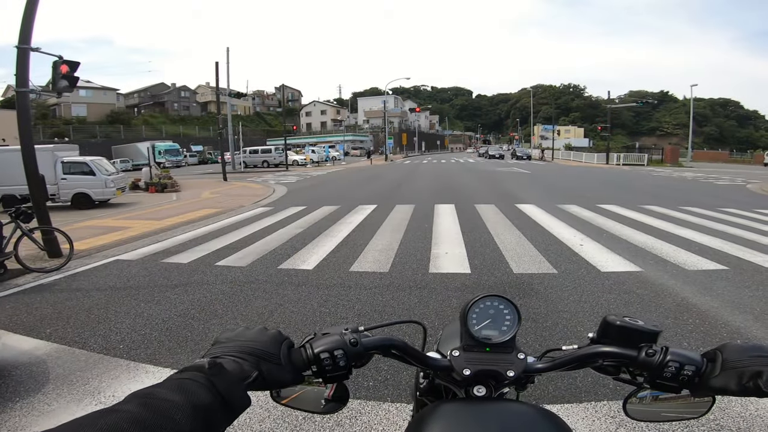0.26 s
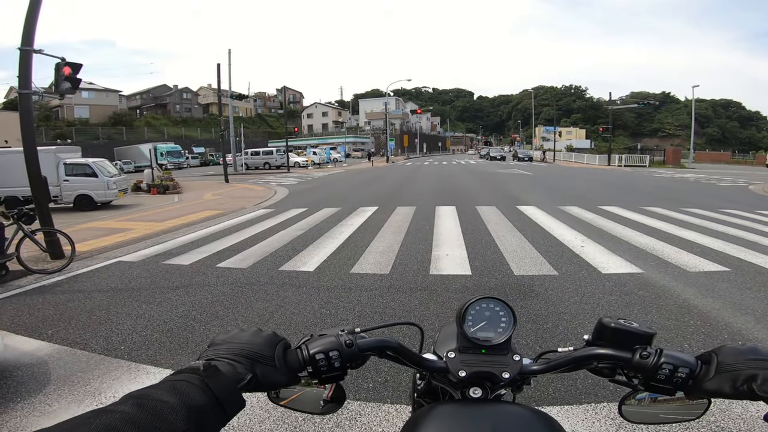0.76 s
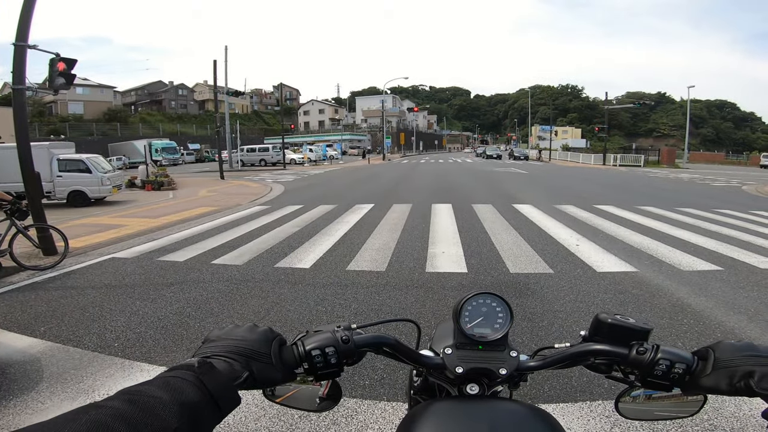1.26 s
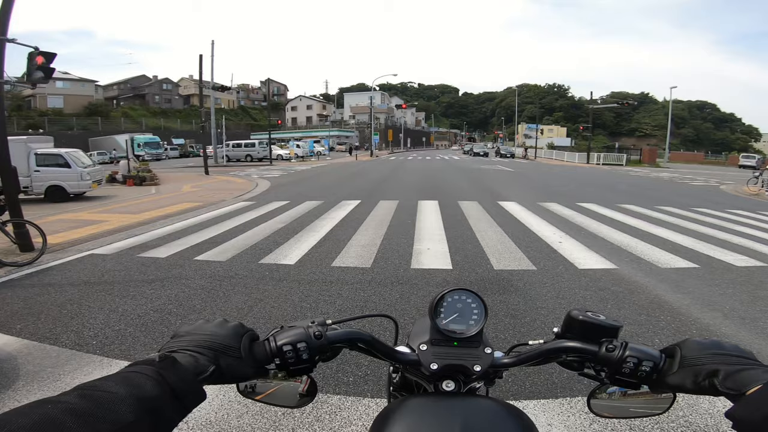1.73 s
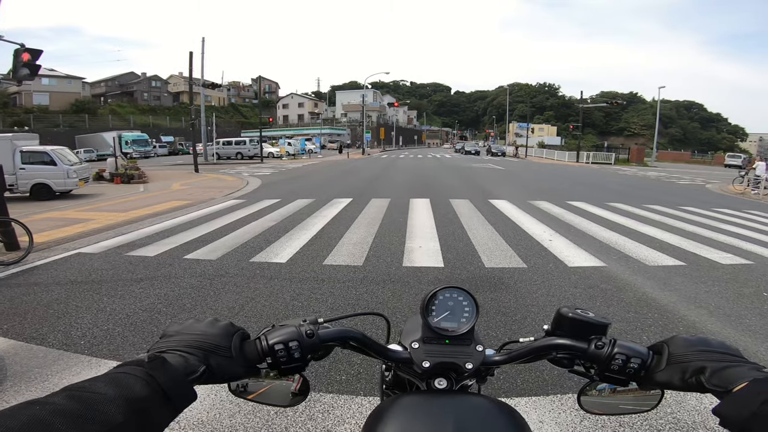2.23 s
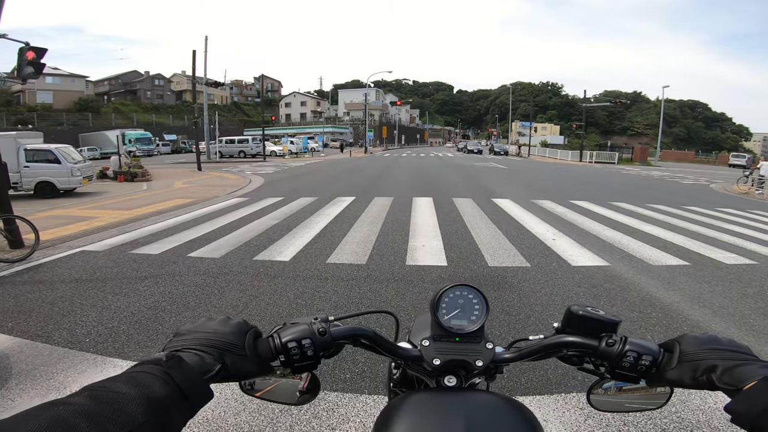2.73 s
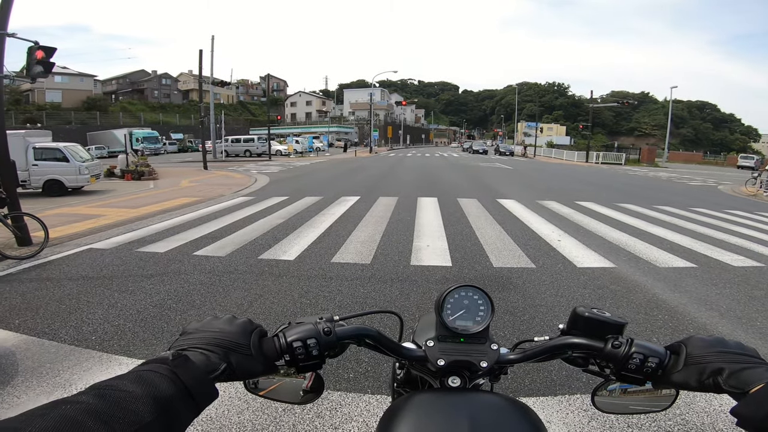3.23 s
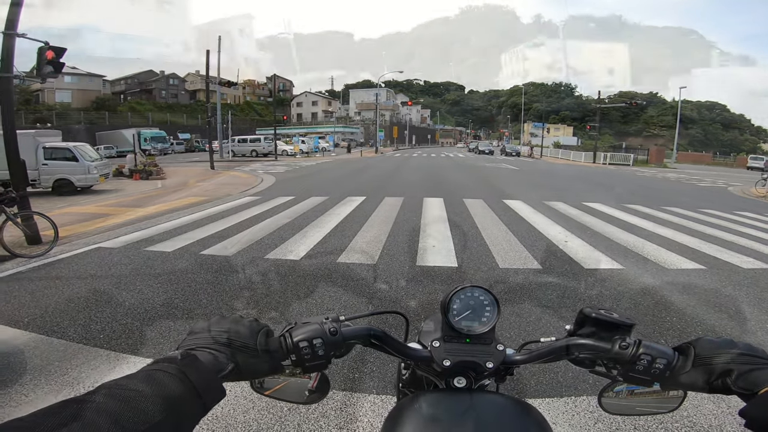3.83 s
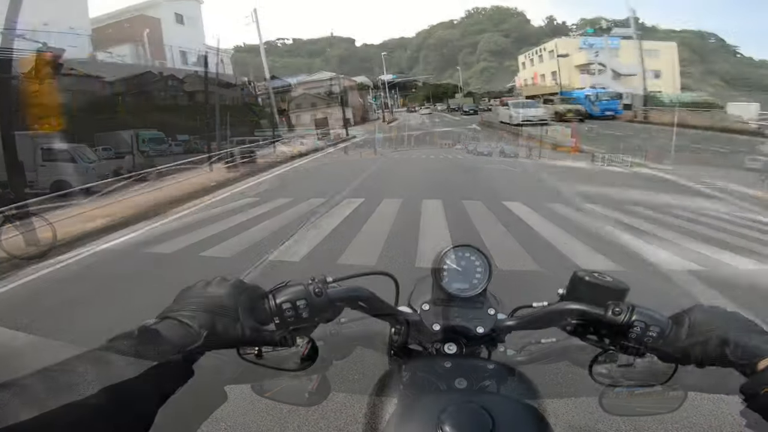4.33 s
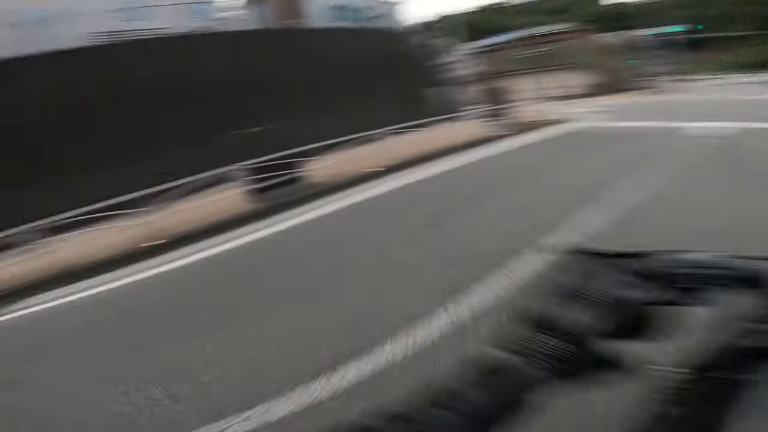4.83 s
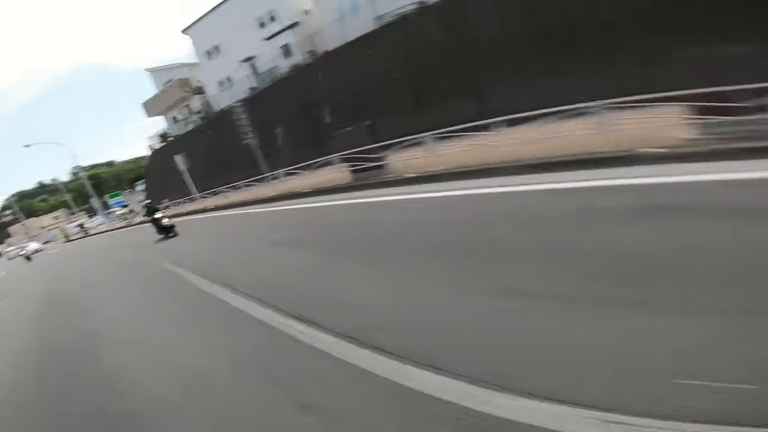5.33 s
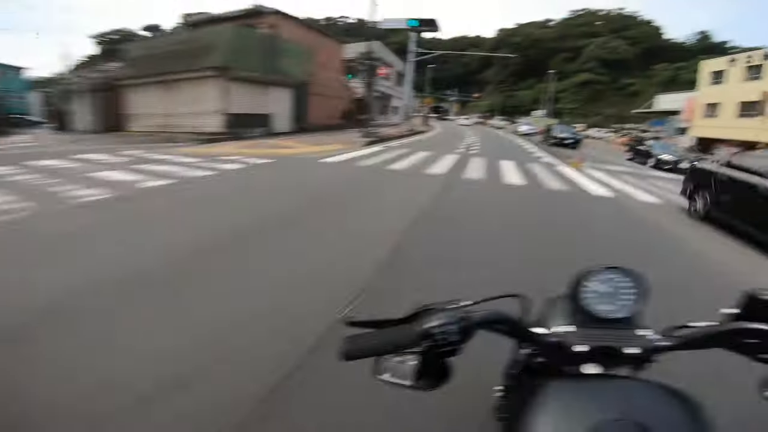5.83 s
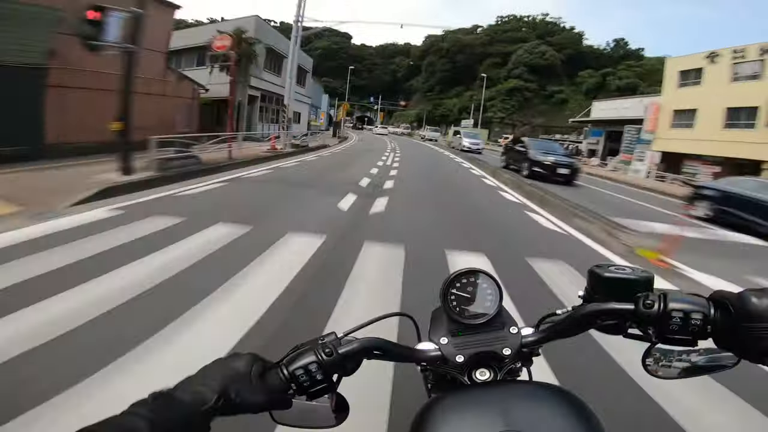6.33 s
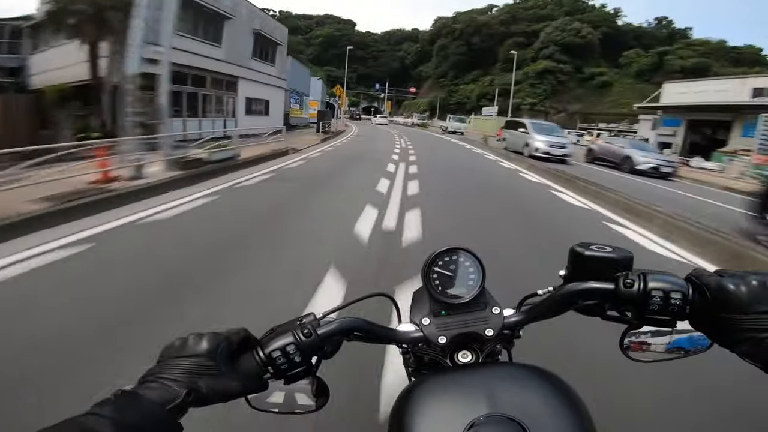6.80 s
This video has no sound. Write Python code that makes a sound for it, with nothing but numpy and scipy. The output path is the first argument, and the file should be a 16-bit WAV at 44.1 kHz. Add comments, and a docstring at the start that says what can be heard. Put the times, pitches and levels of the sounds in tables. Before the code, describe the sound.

From the start, a V-twin motorcycle idles close by, heard from the saddle. It chugs in a low, limping rhythm, with occasional weak beats, sharp exhaust puffs and a light metallic valve rattle. The bass sits near the centre and the crackle to the right. Between about 3.7 and 4.5 seconds the idle cross-fades into the faster, steadier beat of the bike on the move, and a wide road roar comes up. From 4.3 to 4.8 seconds the throttle shuts and the exhaust softens while low gusts of wind buffet the microphone. At about 4.8 seconds the engine comes back louder and raspier. Several short whooshes pass between 4.8 and 5.8 seconds, alongside a thin, steady whine. From 6 seconds the road noise recedes and the revs climb gently, the exhaust crackling harder until the end at about 7 seconds.

```python
"""A lumpy V-twin idle, heard from the saddle; around 4 s it cross-fades into riding along a street.
Each firing rings its pipe, whose pitch climbs late in the stroke as the piston shrinks the cylinder
behind the open exhaust valve. Gas cracks out of the pipes on the right, each blow-down strikes the
metal, and the valve gear rattles. Road roar, wind, whooshes and a thin whine join on the move."""
import sys
import numpy as np
from scipy import signal
from scipy.fft import rfft, irfft
from scipy.io import wavfile
from scipy.ndimage import uniform_filter1d

SR = 44100
rng = np.random.default_rng(int(sys.argv[2]) if len(sys.argv) > 2 else 0)


def unload_audio(sound):
    """Save the sound as a 16-bit wav file, at the path given as the first command line argument."""
    columns = np.transpose(np.atleast_2d(sound))
    # keep every value between -1 and 1, then stretch to whole-number steps
    steps = np.round(np.clip(columns, -1, 1) * 32767)
    wavfile.write(sys.argv[1], SR, steps.astype(np.int16))


N = 311326
T, HZ = np.arange(N) / SR, np.arange(1, N // 2 + 2) * SR / N

# Stereo image, left ear against right
EAR_BALANCE = [(60, -1), (110, -1.0), (200, -1), (380, -1), (700, -9.5), (1290, -9.5), (2380, -9),
               (4400, -6.5), (8120, -10), (15000, -4)]  # f/Hz, left minus right/dB
EAR_LEAD = [(0, 0), (430, 0.44), (780, -2), (1550, -2.5), (2410, -5.5), (2760, -4.5), (3880, -4.5),
            (4310, -5), (5080, -8), (7750, -9), (9300, -15), (11600, -8.5), (14200, -6), (15200, -12.5)]  # f/Hz, left lead/rad
EAR_LIKENESS = [(60, 1), (300, .9), (650, .65), (1500, .62), (4000, .55), (9000, .4)]  # f/Hz, likeness/0-1
# Noise colours: f/Hz, relative level/dB
WIND_COLOUR = [(15, -21), (45, -6.5), (120, -11.5), (250, -16.5), (500, -33.5), (1500, -56), (8000, -100)]
ROAD_COLOUR = [(100, -12), (250, -1.5), (500, -9.5), (900, -15.5), (1400, -17), (2500, -27), (5000, -38),
               (10000, -46), (15500, -105.5)]
WHOOSH_COLOUR = [(250, -8.5), (500, -10), (1000, -12.5), (2000, -20), (3500, -36), (8000, -50),
                 (15500, -87)]
RATTLE_COLOUR = [(210, -14), (350, -2), (367, -5), (417, -1), (619, -12.5), (920, -11), (1060, -14.5),
                 (1730, -9), (2200, -16.5), (2620, -15.5), (3950, -26.5), (8730, -33), (13800, -59),
                 (15400, -72)]
IDLE_CRACK_COLOUR = [(300, -18), (800, 3), (1300, -5), (1750, 2), (2150, -4.5), (2650, -4), (3600, -10),
                     (5000, -16.5), (7800, -19.5), (10000, -23), (12000, -34), (15500, -43)]
HOT_CRACK_COLOUR = [(300, -21), (800, 5.5), (1300, -3), (2000, 2), (2650, -2), (3600, -7.5), (5000, -12.5),
                    (7800, -14.5), (10000, -21), (12000, -29), (15500, -38)]
# Faders for the wind between gusts, the road and the whole idle: t/s, level/dB
BREEZE_FADER = [(3.7, -65), (4.2, -54), (5.0, -26), (7.06, -33)]
ROAD_FADER = [(3.7, -86), (3.9, -58), (4.33, -25), (4.75, -22.5), (5.0, -26.5), (5.85, -28), (6.1, -29.5),
              (7.06, -47)]
IDLE_FADER = [(0, -12), (3.7, -12), (4.0, -17.5), (4.3, -22.5), (4.55, -15.5)]
# Riding faders, throttle shut from 4.3 to 4.8 s: t/s, pipe level/dB, crack level/dB
RIDE_FADERS = [(3.7, -42, -40), (3.9, -25.5, -31), (4.1, -17, -28), (4.29, -16.5, -25), (4.33, -22.5, -42),
               (4.62, -16.5, -47), (4.75, -13, -60), (4.85, -11.5, -26.5), (5.2, -13, -31), (5.6, -13, -26),
               (6.1, -13, -21), (7.06, -10.5, -17.5)]
# Swells of air: t/s, length/s, level/dB
GUST_SWELLS = [(4.25, .12, -25), (4.38, .1, -20), (4.6, .2, -22), (4.85, .08, -24), (5.32, .08, -27),
               (5.46, .1, -24), (6.75, .15, -36)]
WHOOSH_SWELLS = [(4.864, 0.06, -25), (5.015, 0.16, -20.5), (5.63, 0.16, -24.5), (5.718, 0.15, -25)]
# Path of the whine: t/s, f/Hz, level/dB
WHINE_PATH = [(4.6, 352.5, -65), (4.8, 349, -27), (5.0, 344.6, -27.5), (5.5, 349.7, -26.5),
              (5.75, 349, -34), (5.95, 351, -56)]
# Modes of heads and pipes: f/Hz, idle level/dB, riding level/dB, t60/s
METAL_MODES = [(415, -24, -27, .05), (1780, -32, -28, .035), (2450, -22, -21, .042), (2750, -20, -20, .045),
               (3300, -28, -20, .04), (3950, -28, -21, .04), (4700, -36, -28, .035)]
# A pipe through its exhaust stroke; past 1 the valve has shut:
# share of valve-open time, pitch f/Hz, level/dB, overtone f/Hz, level/dB
FRONT_IDLE_STROKE = [(0, 90, -9, 284, -11), (.2, 94.8, 2, 227, -13), (.42, 73.8, -3, 213.7, -19),
                     (.65, 82.5, 4, 251.4, -21), (.85, 114, -1.5, 302, -21), (.96, 179, -2.5, 303, -10),
                     (1.05, 135, -19, 306.2, -11)]
REAR_IDLE_STROKE = [(0, 84.3, -16.5, 256, -38.5), (0.151, 98.8, 2.5, 247.5, -11.5), (.4, 91, 3, 240, -55),
                    (.7, 117.7, 2, 274, -33), (.95, 156, 3, 341, -67.5), (1.05, 116.8, -4, 311, -25.5)]
FRONT_RIDE_STROKE = [(0, 71.3, -12, 300, -21), (.2, 134, 8, 249.3, -9.5), (.36, 102, 5.5, 241.5, -5),
                     (.58, 62, 1.5, 244, -11.5), (.82, 102, -2, 265, -16.5), (.97, 197, 4.5, 301, -37.5),
                     (1.05, 131, -16.5, 310.6, -12)]
REAR_RIDE_STROKE = [(0, 92.7, -11, 270, -21.5), (.2, 121.7, 8, 278.7, -25), (.45, 103.2, 5.5, 288, -9.5),
                    (.72, 111, 0.5, 282.5, -16.5), (0.922, 188, 2, 310, -27.5),
                    (1.052, 125, -19, 297.2, -14)]
# Upper pipe voices: t/s, bark f/Hz, bark level/dB, third partial against overtone/dB, metal level/dB
IDLE_VOICING = [(0, 890, -20, -32.5, -3.5), (4.5, 790, -31, -19, -3)]
RIDE_VOICING = [(3.701, 1050, -15, -15, -1), (4.3, 1030, -9, -9.5, -2.5), (4.4, 900, -28, -29, -14),
                (4.8, 976, -41, -12, -10), (5.0, 1112, 0.5, -2.5, -2), (5.7, 1090, -1, -22, -2),
                (5.9, 1010, -9.5, -6, 6), (6.3, 880, -6.5, -0.5, -3), (7.06, 830, -5, -8, -2.5)]
# Engine speed: t/s, speed/rpm
IDLE_REVS = [(-.02, 942.3), (.15, 890.7), (.35, 941.9), (.9, 968.2), (1.3, 948.1), (2.1, 890.3),
             (2.6, 911.9), (3.0, 868.6), (3.6, 924), (3.8, 899), (4.5, 916)]
RIDE_REVS = [(3.7, 1648.3), (4.3, 1644.4), (4.7, 1594.4), (4.85, 1654.8), (5.05, 1599.3), (5.5, 1626.6),
             (6.0, 1658.5), (6.5, 1766.1), (7.2, 1851.5)]
# Odd rear firings at idle, most of them weak: t/s, charge/dB, crack level/dB
REAR_STUMBLES = [(.12, -3, -25), (.38, -6, -22), (.63, -3.5, -22), (.88, -8.5, -14), (1.26, -4, -25),
                 (1.51, -8.5, -25), (1.9, 1.5, -10), (2.17, 0.5, -2.5), (2.7, 1.5, -8), (2.84, 0.5, -1.5),
                 (3.64, -6, -26), (4.04, -12.5, 7), (4.17, -24, -13), (4.3, -6, 5), (4.44, -16, -7)]

OPEN_SHARE, REAR_LAG, VALVE_SEATS = .37, .423, .73  # shares of a cycle
PITCH_T60_S, OVERTONE_T60_S = .31, .28  # pipe decay with the valve shut
GUST_DB, FLICKER_DB, CRACK_SCATTER_DB = 2.4, 1.5, 1.1  # random level swings
HOT_FROM_DB, HOT_SPAN_DB = -36.5, 14.5  # the crack takes on the hot colour as it grows louder


def undb(db):
    """Gain of a level in dB."""
    return 10 ** (np.asarray(db) / 20)


def curves(table):
    """Each column of a timed table, sample by sample."""
    s, *columns = np.transpose(table)
    return [np.interp(T, s, c) for c in columns]


def over_hz(table):
    """A table of f/Hz, value spread over the spectrum."""
    f, v = np.transpose(table)
    return np.interp(np.log(HZ), np.log(np.maximum(f, 1)), v)


def walk(rate):
    """Smooth random wobble, rate steps a second; spread near 1."""
    k = int(SR / rate)
    steps = np.repeat(rng.standard_normal(N // k + 1), k)
    return 1.33 * uniform_filter1d(uniform_filter1d(steps, k), k)[:N]


def swells(events, t):
    """Bell-shaped swells from rows of t/s, length/s, height."""
    return sum(height * np.exp(-((t - at) / length) ** 2 * 4) for at, length, height in events)


def add(out, s, grain):
    """Mix a grain in at time s."""
    i = int(round(s * SR))
    part = grain[max(-i, 0):max(N - i, 0)]
    out[max(i, 0):max(i, 0) + len(part)] += part


def ring(t, hz, db, t60):
    """A struck mode dying away."""
    return undb(db - 60 * t / t60) * np.sin(2 * np.pi * hz * t)


def ears():
    """Phase lead, likeness and balance of the left ear against the right."""
    lead = np.exp(1j * np.interp(HZ, *np.transpose(EAR_LEAD)))
    return lead, np.clip(over_hz(EAR_LIKENESS), 0, 1), over_hz(EAR_BALANCE)


def at_ears(tone):
    """Place a tone: bass near the centre, treble to the right."""
    lead, _, pan_db = ears()
    return irfft([rfft(tone) * lead * undb(pan_db / 2), rfft(tone) * undb(-pan_db / 2)], N)


def noise(spectrum, envelope, like, pan_db):
    """Stereo noise, shaped then coloured; like is the channels' likeness, with its phase."""
    colour = undb(over_hz(spectrum))
    colour /= np.sqrt(np.mean(colour ** 2))
    right, other = rfft(rng.standard_normal((2, N)) * envelope) * colour
    left = like * right + np.sqrt(np.clip(1 - np.abs(like) ** 2, 0, 1)) * other
    return irfft([left * undb(pan_db / 2), right * undb(-pan_db / 2)], N)


def bike_noise(spectrum, envelope):
    """Noise placed to the right, with the pipes."""
    lead, like, pan_db = ears()
    return noise(spectrum, envelope, lead * like, pan_db)


def road_roar():
    """A wide, wavering bed of road noise."""
    lead, like, pan_db = ears()
    level = undb(curves(ROAD_FADER)[0] + 1.5 * walk(11))
    return noise(ROAD_COLOUR, level, .25 * lead * like, .33 * pan_db)


def wind():
    """Low buffeting at the ears: a breeze with gusts on top."""
    gusts = swells([(at, length, undb(db)) for at, length, db in GUST_SWELLS], T)
    blowing = undb(curves(BREEZE_FADER)[0]) + gusts
    return noise(WIND_COLOUR, blowing * undb(GUST_DB * walk(25)), like=.41, pan_db=2.1)


def whooshes():
    """Short swells of noise, largely out of phase between the ears."""
    level = swells([(at, length, undb(db)) for at, length, db in WHOOSH_SWELLS], T)
    return noise(WHOOSH_COLOUR, level, like=-.82, pan_db=2.5)


def whine():
    """A thin, flickering sine in the centre."""
    hz, db = curves(WHINE_PATH)
    return undb(db + FLICKER_DB * walk(14)) * np.sin(2 * np.pi / SR * np.cumsum(hz))


def valve_rattle(db):
    """The valve gear's clatter, as flickering noise."""
    return bike_noise(RATTLE_COLOUR, undb(db + FLICKER_DB * walk(40)))


def valve_knock(luck):
    """A valve knocks onto its seat."""
    return ring(np.arange(SR // 10) / SR, hz=790 * (1 + .016 * luck[0]), db=-21 + 2.2 * luck[1], t60=.06)


def metal_ring(t, db, under_load, luck):
    """The blow-down strikes heads and pipes, a little differently each time."""
    metal = np.zeros(len(t))
    for (hz, idle_db, ride_db, t60), (detune, accent) in zip(METAL_MODES, luck.reshape(-1, 2)):
        mode_db = ride_db if under_load else idle_db
        metal += ring(t, hz * (1 + .035 * detune), db + mode_db + 4 * accent, t60)
    return metal * (1 - np.exp(-t / .0015))


def gas_puff(t, decay_s):
    """Envelope of the blow-down jet: a sharp crack with a soft tail."""
    return (1 - np.exp(-t / .0013)) * (np.exp(-t / decay_s) + .17 * np.exp(-t / .025))


def pipe_bark(t, hz, db):
    """The pipe's rasp: a cluster of short rings."""
    cluster = sum(ring(t, ratio * hz, db + trim_db, t60=.03)
                  for ratio, trim_db in ((.68, -3), (.86, -5), (1, 2), (1.3, -7)))
    return cluster * (1 - np.exp(-t / .0015))


def pipe_tone(t, open_s, stroke, charge_db, third_db, tuning):
    """Three partials glide as the piston moves, then ring out behind the shut valve."""
    share, *columns = np.transpose(stroke)
    progress = t / open_s
    low_hz, low_db, high_hz, high_db = (np.interp(progress, share, c) for c in columns)
    shut_s = np.maximum(t - share[-1] * open_s, 0)
    low_phase, high_phase = 2 * np.pi / SR * tuning * np.cumsum([low_hz, high_hz], axis=1)
    body = undb(low_db - 60 * shut_s / PITCH_T60_S) * np.sin(low_phase)
    overtones = np.sin(high_phase) + undb(third_db) * np.sin(1.56 * high_phase)
    overtones *= undb(high_db - 60 * shut_s / OVERTONE_T60_S)
    # a weak charge starts faint, but the rising piston pumps the pipe up and cooler gas rings longer
    pump_db = 1.5 * charge_db * np.clip(1 - progress / 1.045, -.4, 1)
    return (body + overtones) * undb(pump_db)


def cylinder(opens, lengths, charges, cracks, stroke, under_load):
    """One cylinder's tone and crack envelope; bark, jet and metal trail the valve by a few ms."""
    tone, gas, t = np.zeros(N), np.zeros(N), np.arange(SR // 4) / SR
    when, *voices = np.transpose(RIDE_VOICING if under_load else IDLE_VOICING)
    puff = gas_puff(t, decay_s=.0046 if under_load else .0102)
    for s, length, charge_db, crack_db in zip(opens, lengths, charges, cracks):
        luck = rng.standard_normal(4 + 2 * len(METAL_MODES))
        bark_hz, bark_db, third_db, metal_db = (np.interp(s, when, v) for v in voices)
        add(tone, s, pipe_tone(t, OPEN_SHARE * length, stroke, charge_db, third_db, 1 + .011 * luck[0]))
        bark = pipe_bark(t, bark_hz * (1 + .083 * luck[2]), bark_db + .5 * crack_db + 1.9 * luck[3])
        add(tone, s + .00095, bark)
        add(gas, s + .0025, undb(crack_db + CRACK_SCATTER_DB * luck[1]) * puff)
        add(tone, s + .004, metal_ring(t, metal_db + crack_db, under_load, luck[4:]))
    return tone, gas


def firings(rpm, first_s):
    """When the front valve opens, once every two turns, and the revs there."""
    step_s = .001
    t = np.arange(rpm[0][0], rpm[-1][0], step_s)
    revs = np.interp(t, *np.transpose(rpm))
    cycles = np.cumsum(revs) * step_s / 120
    cycles -= np.interp(first_s, t, cycles)
    opens = np.interp(np.arange(int(cycles[-1]) + 1), cycles, t)
    return opens, np.interp(opens, t, revs)


def v_twin(opens, accents_db, front_stroke, rear_stroke, under_load):
    """Two cylinders fire in a limping rhythm, with one valve knock a cycle."""
    front_charge, rear_charge, front_crack, rear_crack = accents_db.T
    lengths = np.append(np.diff(opens), opens[-1] - opens[-2])
    rear_opens = opens + REAR_LAG * lengths
    tone, gas = cylinder(opens, lengths, front_charge, front_crack, front_stroke, under_load)
    rear_tone, rear_gas = cylinder(rear_opens, lengths, rear_charge, rear_crack, rear_stroke, under_load)
    for s in opens + VALVE_SEATS * lengths:
        add(tone, s, valve_knock(rng.standard_normal(2)))
    return tone + rear_tone, gas + rear_gas


def idling_engine():
    """Lumpy chugs until about 4.5 s, over a rattle and low rumble that run on to the end."""
    opens, revs = firings(IDLE_REVS, first_s=-.0135)
    # front charge, rear charge, front crack, rear crack
    accents_db = rng.normal([2.5, .7, 3, 4.5], [.6, .6, 1.2, 1.8], (len(opens), 4))
    accents_db[:, 0] += 3 * (revs - 900) / 100  # the front hits harder as the revs rise
    for at, charge_db, crack_db in REAR_STUMBLES:
        accents_db[np.argmin(np.abs(opens - at)), 1::2] = charge_db, crack_db
    tone, gas = v_twin(opens, accents_db, FRONT_IDLE_STROKE, REAR_IDLE_STROKE, under_load=False)
    cracks = bike_noise(IDLE_CRACK_COLOUR, undb(-20) * gas)
    rattle = valve_rattle(db=-24.5)
    rumble = noise(WIND_COLOUR, undb(-22.5 + GUST_DB * walk(7.1)), like=.94, pan_db=0)
    return undb(curves(IDLE_FADER)[0]) * (at_ears(tone) + cracks + rattle + rumble)


def riding_engine():
    """Steadier firings under load; the rattle rises and falls with the gas cracks."""
    pipe_db, crack_db = curves(RIDE_FADERS)
    opens, revs = firings(RIDE_REVS, first_s=3.7427)
    charge_db = 2 - (revs - 1600) / 100  # thins as the revs rise
    charge_db += swells([(4.66, .22, -5)], opens)  # sags while the throttle is shut
    scatter_db = rng.standard_normal((len(opens), 4)) * [.4, .4, CRACK_SCATTER_DB, CRACK_SCATTER_DB]
    accents_db = charge_db[:, None] + scatter_db
    tone, gas = v_twin(opens, accents_db, FRONT_RIDE_STROKE, REAR_RIDE_STROKE, under_load=True)
    hot = np.clip((crack_db - HOT_FROM_DB) / HOT_SPAN_DB, 0, 1)
    cracks = bike_noise(HOT_CRACK_COLOUR, np.sqrt(hot) * undb(crack_db) * gas)
    cracks += bike_noise(IDLE_CRACK_COLOUR, np.sqrt(1 - hot) * undb(crack_db) * gas)
    fade_in = np.clip((T - RIDE_FADERS[0][0]) / .33, 0, 1)
    rattle = fade_in * valve_rattle(db=-15.5 + .64 * crack_db)
    return at_ears(undb(pipe_db) * tone) + cracks + rattle


def scene():
    """The idle hands over to the ride, and road and air come up around it."""
    return idling_engine() + riding_engine() + road_roar() + wind() + whine() + whooshes()


def record(dry):
    """Master chain: thin the deepest bass, round the loudest peaks, cut the top."""
    low_cut = signal.butter(2, 22, "high", fs=SR, output="sos")
    high_cut = signal.ellip(10, .2, 80, 15600, fs=SR, output="sos")
    rounded = np.tanh(1.036 * signal.sosfilt(low_cut, dry)) / 1.205
    return signal.sosfilt(high_cut, rounded)


dry = scene()
out = record(dry)
unload_audio(out)
```